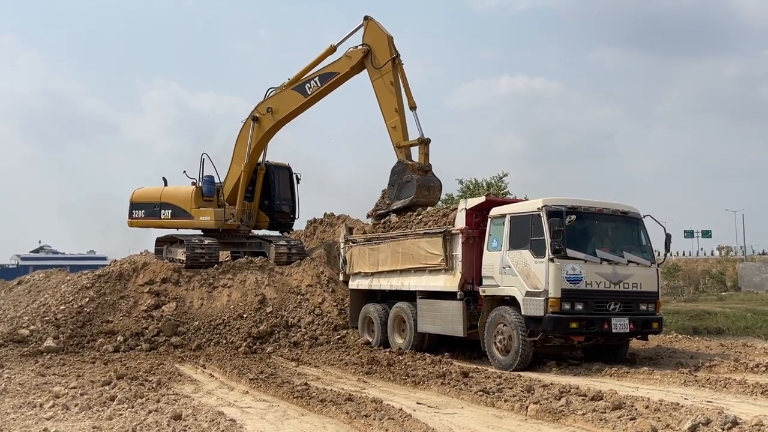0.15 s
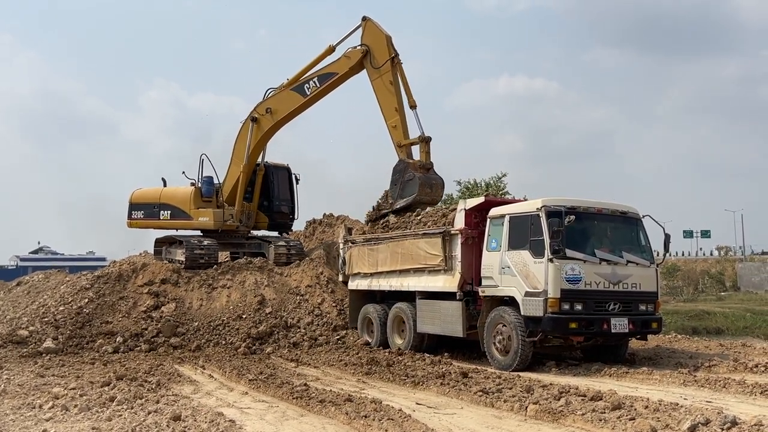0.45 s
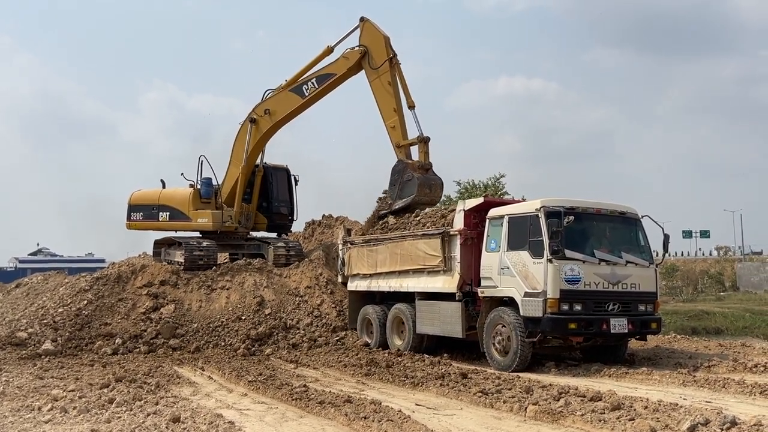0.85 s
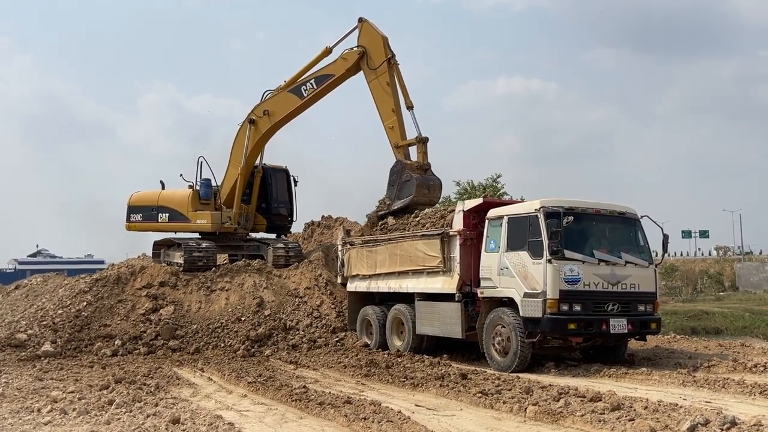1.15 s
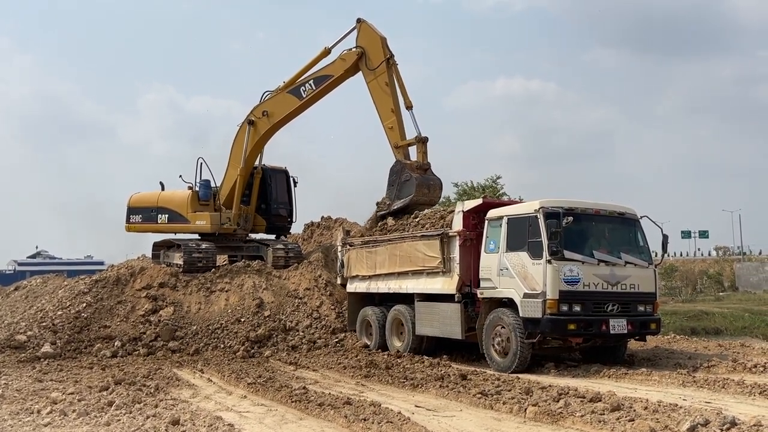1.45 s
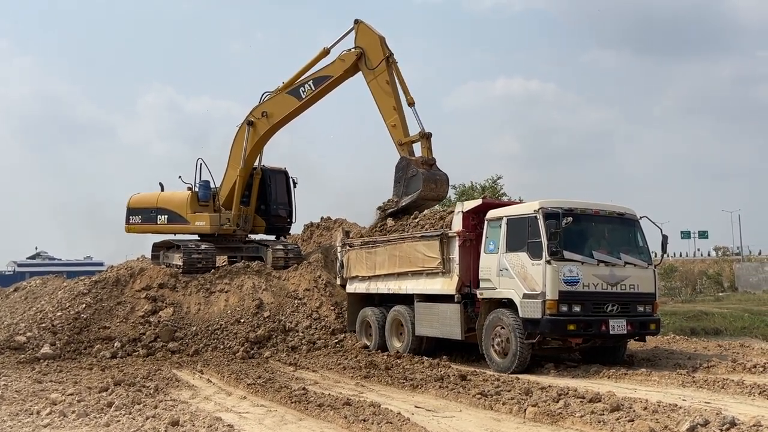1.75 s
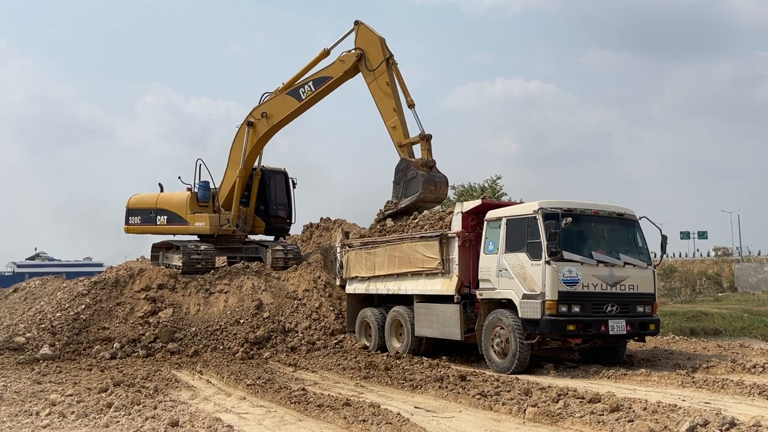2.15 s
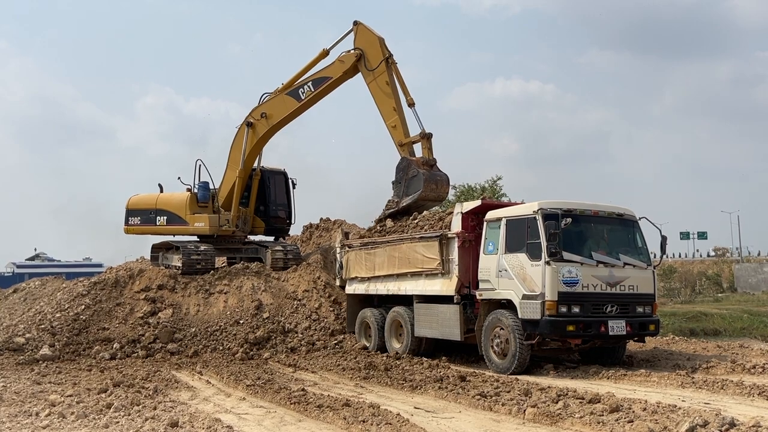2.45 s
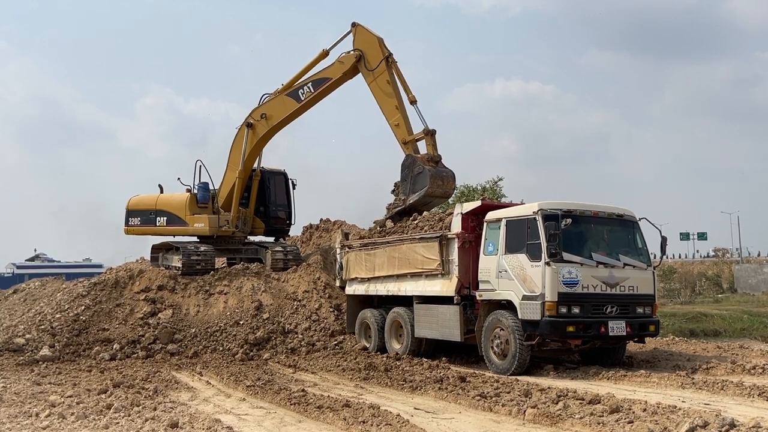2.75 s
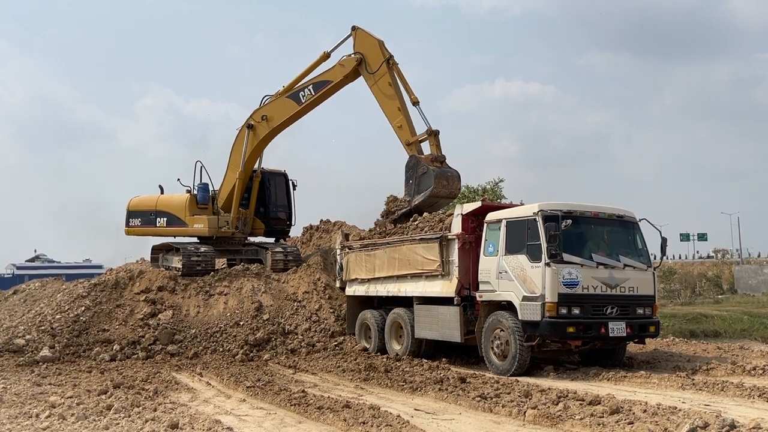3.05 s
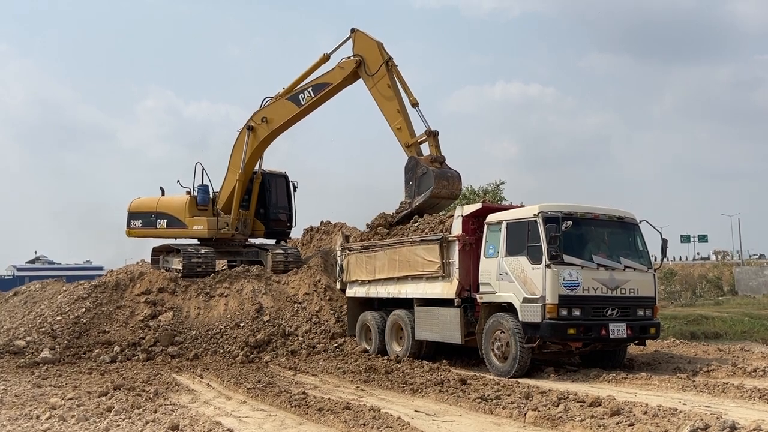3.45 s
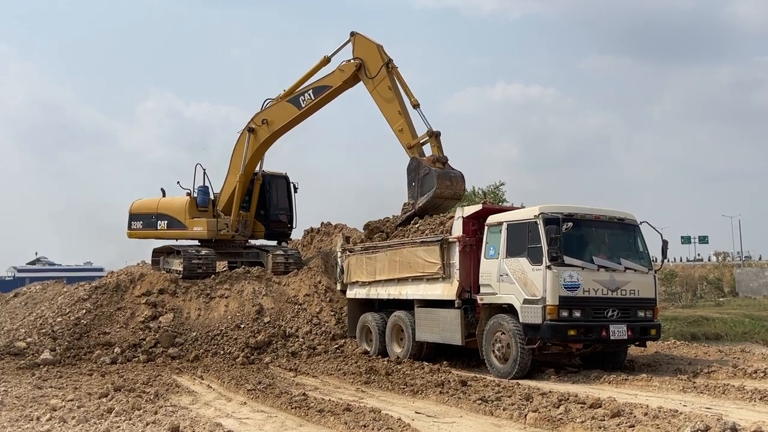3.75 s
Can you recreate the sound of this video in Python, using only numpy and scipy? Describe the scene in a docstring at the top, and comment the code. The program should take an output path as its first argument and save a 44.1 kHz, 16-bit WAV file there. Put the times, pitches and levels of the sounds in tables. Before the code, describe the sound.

An excavator's steel bucket clanks in quick clusters, after clods thud heavily into a truck bed. Its diesel drones and sags, hydraulics hiss, and a truck throbs low; open outdoor site, stereo microphone, no echo.

```python
"""A steel excavator bucket works in the load of an idling dump truck, on an open earthwork site.
Its loose joints clank in quick clusters: bursts of noise and sine modes. Its shell rings on as decaying sines.
Clods thud into the truck bed as short pushes with dull noise, and loose earth tumbles between them.
Behind, the excavator's diesel sags under load (sines locked to the firing rate) while its hydraulics hiss.
The truck throbs low; both machines stand ahead of a two-port microphone, with no echo."""
import sys
import numpy as np
from scipy import signal
from scipy.fft import rfft, irfft
from scipy.io import wavfile
from scipy.ndimage import uniform_filter1d

SR = 44100
rng = np.random.default_rng(int(sys.argv[2]) if len(sys.argv) > 2 else 0)


def store_pcm(level_fs):
    """Save levels as 16-bit WAV."""
    pcm = np.round(np.clip(level_fs, -1, 1) * 32767).astype(np.int16)
    wavfile.write(sys.argv[1], SR, np.atleast_2d(pcm).T)


N = 171990  # length in samples


def amp(db):
    """Decibels to gain."""
    return 10 ** (np.asarray(db) / 20)


def unit(x):
    """Scale to rms 1."""
    return x / np.sqrt(np.mean(x ** 2))


def curve(table, axis):
    """One column of a table, joined by straight lines over time."""
    rows = np.array(table)
    return np.interp(np.arange(N) / SR, rows[:, 0], rows[:, axis])


def noise(points, tilt_db=0, size=N):
    """Random-phase noise of a given spectrum, tilted in dB per octave, at rms 1."""
    hz, db = np.array(points).T
    octave = np.log2(np.maximum(np.fft.rfftfreq(size, 1 / SR), 10))
    spectrum_db = np.interp(octave, np.log2(hz), db)
    spectrum_db = spectrum_db + tilt_db * np.minimum(octave, np.log2(hz[-1]))
    phase = 2 * np.pi * rng.random(len(spectrum_db))
    return unit(irfft(amp(spectrum_db) * np.exp(1j * phase), size))


def wide(points, width_db, tilt_db=0, size=N):
    """Stereo noise: a common middle and a weaker side, opposite in the two channels."""
    middle = noise(points, tilt_db, size)
    side = amp(width_db) * noise(points, tilt_db, size)
    return middle + np.array([[1], [-1]]) * side


def walk(rate):
    """Smoothed random drift with a spread of 1, drawn anew at a rate in Hz."""
    k = int(SR / rate)
    steps = np.repeat(rng.standard_normal(N // k + 1), k)
    smooth = uniform_filter1d(uniform_filter1d(steps, k), k)
    return unit(smooth[:N])


def turns(hz):
    """Cycles run through at a moving rate, from a random start."""
    return np.cumsum(hz) / SR + rng.random()


def tone(cycles):
    """A sine of rms 1."""
    return np.sqrt(2) * np.sin(2 * np.pi * cycles)


def fade(t, attack_s, t60):
    """A quick linear rise, then an exponential decay by 60 dB in t60 seconds."""
    return np.minimum(t / attack_s, 1) * np.exp(-np.log(1000) * np.maximum(t - attack_s, 0) / t60)


def burst(envelope, sound):
    """Sound under an envelope, scaled so that its energy is the envelope's own."""
    shaped = envelope * sound
    return unit(shaped) * np.sqrt(np.mean(envelope ** 2))


def add(out, start, sound):
    """Mix a sound in at a time in seconds."""
    i = int(start * SR)
    out[:, i:i + sound.shape[-1]] += sound[..., :N - i]


FLUTTER_DB = 1.5  # spread of the level flutter of each engine line
WIDTH_DB = -10.5  # side against middle, for engine noise and rattle

# The truck's low exhaust throb. Each row: time in seconds, pitch in Hz, level in dB before the lope.
TRUCK_THROB = [(0, 53.3, -17), (.7, 57.3, -55), (1.38, 58.29, -42.5), (1.7, 57.93, -29),
               (2.15, 56.9, -26.5), (2.4, 57, -39), (2.85, 55.8, -25.5), (3.35, 56, -25.5),
               (3.9, 55.4, -26)]
# Drone lines of the idling truck. Each row: pitch in Hz, level in dB before the swell, relative waver.
TRUCK_DRONE = [(206.3, -37.5, 0.003), (283, -47.5, 0.0043), (487.4, -42.5, 0.0079)]
THROB_FLUTTER_DB, LOPE_DEPTH, LOPE_FIRINGS = 2, .45, 4
DRONE_FOLLOWS = 0.24  # dB of drone swell per dB of throb swell


def truck():
    """A low exhaust throb that lopes once an engine cycle, under a few lines that swell with it."""
    throb_db = curve(TRUCK_THROB, axis=2)
    cycles = turns(curve(TRUCK_THROB, axis=1))
    lope = 1 + LOPE_DEPTH * np.sin(2 * np.pi * cycles / LOPE_FIRINGS)
    throb = amp(throb_db + THROB_FLUTTER_DB * walk(20)) * lope * tone(cycles)
    drone = 0
    for hz, db, waver in TRUCK_DRONE:
        line = tone(turns(hz * (1 + waver * walk(20))))
        drone = drone + amp(db + FLUTTER_DB * walk(10)) * line
    swell_db = DRONE_FOLLOWS * (throb_db - throb_db.mean())
    return throb + amp(swell_db) * drone


# Excavator speed. Each row: time in seconds, firing rate in Hz before the wobble.
FIRING_RATE = [(0, 134.1), (.3, 129.2), (.6, 129.8), (.85, 136), (1.4, 134.6), (1.6, 129.5), (1.78, 127.6),
               (1.95, 134.1), (2.42, 134.8), (2.62, 127.5), (3.25, 124.6), (3.4, 132.9), (3.56, 125.5),
               (3.9, 128)]
# Engine effort. Each row: time in seconds, then changes in dB of firing note, rumble with clatter, and hiss.
ENGINE_EFFORT = [(0, -2, 0, 0), (.5, 5, -1.5, -1.5), (.75, -13, 1, -3), (1.1, -5.5, -2.5, -1.5),
                 (1.38, -2.5, -2, -3), (1.6, 2, -2, -0.5), (2.15, 0, 2, -0.5), (2.42, 2, -1.5, -1),
                 (2.8, 0, -2, 4), (3.3, 0, 0, 3.5), (3.65, 2.5, -1, 5), (3.9, -3.5, -3.5, 7)]
# Exhaust orders. Each row: multiple of the firing rate, level in dB at the free firing rate before effort,
# dB gained per Hz of sag under load.
EXHAUST_ORDERS = [(2 / 3, -37, 0.26), (1, -29.5, -0.14), (4 / 3, -44, 0.62), (3 / 2, -48, 0.89),
                  (8 / 3, -50.5, 0.21)]
# Spectrum of the engine's rumble. Each row: frequency in Hz, relative level in dB per Hz.
RUMBLE_SPECTRUM = [(20, -5), (45, -3), (85, 3), (140, -0.5), (215, -0.5), (255, -8.5), (400, -8.5),
                   (490, -6.5), (570, -12), (900, -20.5), (1500, -25.5), (3000, -38.5), (8000, -66)]
# Spectrum of the hydraulic hiss. Each row: frequency in Hz, relative level in dB per Hz.
HISS_SPECTRUM = [(500, 12), (1500, -3), (3000, -4), (5500, -5), (7200, -7.5), (9000, -3.5), (10300, -10),
                 (11200, -8.5), (12500, -54)]
# Thin sizzle, probably of a hydraulic valve. Each row: frequency in Hz, relative level in dB per Hz.
SIZZLE_SPECTRUM = [(7500, -17), (9500, -1), (11800, -8), (13000, -25)]
FREE_FIRING_HZ, WOBBLE = 132.6, 0.005  # unloaded firing rate, relative wobble of the speed
RUMBLE_DB, CLATTER_DB, HISS_DB, SIZZLE_DB = -28, -46, -47, -72.5  # levels before effort
CLATTER_HZ, CLATTER_SHARE = 1080, 1  # band of the clatter, its decay in firing periods
SIZZLE_GROWTH = 4  # dB of sizzle per dB of hiss effort


def excavator():
    """Exhaust orders locked to the firing, clatter at each firing, rumble and hydraulic hiss."""
    firing_hz = curve(FIRING_RATE, axis=1)
    cycles = turns(firing_hz * (1 + WOBBLE * walk(25)))
    sag_hz = FREE_FIRING_HZ - firing_hz
    note = 0
    for multiple, db, load_db in EXHAUST_ORDERS:
        order_db = db + load_db * sag_hz + FLUTTER_DB * walk(14)
        note = note + amp(order_db) * tone(multiple * cycles + rng.random())

    band = [(CLATTER_HZ / 8, -25), (CLATTER_HZ / 2, -2), (CLATTER_HZ, -2),
            (CLATTER_HZ * 4, -17), (CLATTER_HZ * 12, -42)]
    knocks = unit(np.exp(-(cycles % 1) / CLATTER_SHARE) * amp(3.3 * walk(90)))
    clatter = knocks * wide(band, WIDTH_DB)
    body = amp(RUMBLE_DB) * wide(RUMBLE_SPECTRUM, WIDTH_DB) + amp(CLATTER_DB) * clatter

    hiss_effort_db = curve(ENGINE_EFFORT, axis=3)
    hiss = amp(HISS_DB + hiss_effort_db) * wide(HISS_SPECTRUM, WIDTH_DB)
    sizzle = amp(SIZZLE_DB + SIZZLE_GROWTH * hiss_effort_db) * noise(SIZZLE_SPECTRUM)
    engine = amp(curve(ENGINE_EFFORT, axis=1)) * note + amp(curve(ENGINE_EFFORT, axis=2)) * body
    return engine + hiss + sizzle


# Loose earth tumbling between the clods. Each row: time in seconds, level in dB.
TUMBLE_LEVEL = [(.1, -40.5), (.22, -22.5), (.43, -21.5), (.55, -29), (.63, -73)]
# Spectrum of the tumbling earth. Each row: frequency in Hz, relative level in dB per Hz.
TUMBLING_EARTH = [(40, -17), (85, 7), (220, 1.5), (330, -25.5), (520, -22), (1200, -61.5)]
# Clods landing in the bed. Each row: start in seconds, level in dB, tilt in dB per octave, t60 in seconds.
CLOD_THUDS = [(.14, -13, -4, .07), (.175, -8, -1.5, 0.053), (0.207, -11, 1.5, .07),
              (0.225, -8, -4.5, 0.095), (.256, -14, 3, 0.11), (.327, -9.5, -4.5, 0.084),
              (0.341, -15.5, 6.5, 0.028), (.388, -15.5, -2, 0.1), (0.462, -12, -2.5, 0.11),
              (.484, -10.5, -2, 0.15), (.509, -8.5, -2, 0.094), (.519, -11, 4.5, 0.068),
              (.526, -6, -0.5, 0.1), (.541, -6.5, 4, 0.082), (.567, -12.5, -7.5, 0.11),
              (.843, -17, 2.5, 0.061), (1.204, -18, -2.5, .096), (2.117, -14.5, -1.5, .08),
              (2.195, -13.5, -1, 0.042), (2.241, -10.5, -5, 0.067)]
# Spectrum of a clod's dull rumble before its tilt. Each row: frequency in Hz, relative level in dB per Hz.
CLOD_SPECTRUM = [(25, -23), (48, -1), (75, 6.5), (130, -12), (220, -9.5), (330, -10.5), (520, -23),
                 (900, -56), (3000, -77), (12000, -100)]
THUD_ATTACK_S, THUD_WIDTH_DB = 0.00293, -12.5
PUSH_S, PUSH_DB = 0.003, 1  # width of an untilted clod's push, its peak against the rumble's rms
PUSH_TILT_DB = 12.5  # a clod this much brighter per octave pushes half as long


def clods():
    """Loose earth tumbles; each clod gives the bed one push, shorter if it is bright, and a brief dull rumble."""
    out = amp(curve(TUMBLE_LEVEL, axis=1)) * wide(TUMBLING_EARTH, THUD_WIDTH_DB)
    t = np.arange(SR // 2) / SR
    for start, db, tilt_db, t60 in CLOD_THUDS:
        push_s = PUSH_S * 2 ** (-tilt_db / PUSH_TILT_DB)
        u = t / push_s - 2
        push = amp(PUSH_DB) * (1 - 2 * u ** 2) * np.exp(-u ** 2)
        rumble = wide(CLOD_SPECTRUM, THUD_WIDTH_DB, tilt_db, size=len(t))
        add(out, start, amp(db) * burst(fade(t, THUD_ATTACK_S, t60), push + rumble))
    return out


# Knocks on the bucket's shell. Each row: start in seconds, level in dB,
# ring length as a share of the free ring (earth damps it).
SHELL_KNOCKS = [(.592, -20.5, 0.69), (1.842, -23, 0.52), (2.011, -16.5, 0.21), (2.1, -23.5, 0.62)]
# Modes of the shell. Each row: pitch in Hz, relative level in dB, free t60 in seconds.
SHELL_RING_MODES = [(340.4, -1.5, 0.19), (381.2, 0, 0.24), (443.5, -5.5, 1.96), (494.8, 0, 0.19),
                    (586, -13.5, 0.63), (723, -14, 0.81)]
SHELL_WOBBLE, SHELL_FLUTTER_DB = 0.0071, 0.5  # relative spread of pitch, spread of level


def shell():
    """Hollow knocks on the bucket's shell: decaying modes that waver together, one low note lingering."""
    out, t = np.zeros((2, N)), np.arange(SR) / SR
    for start, db, freedom in SHELL_KNOCKS:
        wavering_t = np.cumsum(1 + SHELL_WOBBLE * walk(65.0))[:len(t)] / SR
        ring = 0
        for hz, mode_db, t60 in SHELL_RING_MODES:
            ring = ring + amp(mode_db) * fade(t, 0.0051, t60 * freedom) * tone(hz * wavering_t)
        add(out, start, amp(db + SHELL_FLUTTER_DB * walk(39.3)[:len(t)]) * ring)
    return out


RATTLE_DB, RATTLE_RATE = 2.5, 350  # spread of the chatter, its rate in Hz


def crunch(size):
    """The fast uneven chatter of steel grinding on grit."""
    return amp(RATTLE_DB * walk(RATTLE_RATE))[:size]


# Modes of the bucket linkage. Each row: pitch in Hz, relative level in dB, t60 in seconds.
LINKAGE_MODES = [(770, -1, .3), (1227, -1.5, 0.28), (1487, 1, 0.084), (1740, -16, 0.27), (1868, -1, 0.062),
                 (1967, -2.5, 0.075), (2465, -17.5, 0.42), (2743, -2, 0.11), (2840, 4.5, .11),
                 (3620, 1, 0.093), (3970, -10, 0.092), (4450, 0.5, 0.041), (5370, -3, 0.075),
                 (5740, 1.5, 0.034)]
RESONANCE_DB, RESONANCE_WIDTH_HZ = 6, 47  # gain at the top of a lone resonance before the trim, its width


def linkage(x):
    """Whatever shakes the bucket is coloured by resonances at the modes of its linkage."""
    hz = np.fft.rfftfreq(N, 1 / SR)
    peaks = sum(1 / (1 + 2j * (hz - mode_hz) / RESONANCE_WIDTH_HZ) for mode_hz, _, _ in LINKAGE_MODES)
    gain = 1 + (amp(RESONANCE_DB) - 1) * peaks
    return irfft(rfft(x) * gain, N) / amp(RESONANCE_DB) ** (1 / 3)  # trims the added level


# Bucket clanks. Each row: start in seconds, crash level in dB before the linkage, tilt in dB per octave,
# ring against crash in dB, frequency in Hz around which the modes ring most.
BUCKET_CLANKS = [(.123, -33, -1, -12, 2170), (.176, -33, -1, -2, 2720), (.194, -28.5, 0, -4, 1570),
                 (.566, -30, -3.5, -17, 1983), (0.579, -20.5, 1, -23, 2050), (.59, -20, 4.5, -12, 2100),
                 (.763, -35, 3, 5, 2900), (.808, -23.5, -0.5, -8.5, 3440), (.852, -28.5, -3.5, -11, 1390),
                 (1.831, -23, 1.5, -5, 1810), (1.841, -13.5, -2, -10.5, 4200), (1.853, -21, 1, -3, 1530),
                 (1.927, -25, -6, -13, 2317), (2.012, -28.5, -4, -13, 2000), (2.051, -26.5, 2.5, -8, 2500),
                 (2.058, -18.5, -1.5, -14, 2380), (2.076, -16, -0.5, -7, 1300),
                 (2.082, -22.5, 4.5, 3.5, 3300), (2.84, -28, -3.5, -8, 1490), (3.246, -41.5, -2, 8, 2040),
                 (3.373, -26.5, 3.5, 3.5, 2860), (3.383, -23, -9.5, -10, 1250),
                 (3.393, -18.5, -2.5, -2, 1690), (3.404, -20.5, -2, -4.5, 3900)]
# Spectrum of a steel crash before tilt and linkage. Each row: frequency in Hz, relative level in dB per Hz.
STEEL_SPECTRUM = [(100, -19), (280, -8), (400, 8), (750, 1.5), (930, 0), (1500, -1.5), (2050, 1),
                  (3200, -4), (4300, -9), (6200, -18), (9000, -24), (12000, -48.5)]
# Earth and steel rattling down after the big clanks. Each row: start in seconds, level in dB before the
# linkage, tilt in dB per octave, t60 in seconds.
RATTLE_FALLS = [(.595, -25.5, 5.5, 0.31), (1.85, -22, 1, 0.43), (2.075, -20, -2.5, 0.38),
                (3.4, -21.5, -4, 0.26)]
# Spectrum of that rattle before tilt and linkage. Each row: frequency in Hz, relative level in dB per Hz.
RATTLE_SPECTRUM = [(200, 6), (420, 11.5), (750, 12), (1000, 1), (2100, -1), (3000, -11), (4500, -18),
                   (12000, -60)]
CLANK_ATTACK_S, CLANK_T60_S, RATTLE_RISE_S = 0.0014, 0.12, 0.023
FOCUS_DB_PER_OCTAVE = 20  # loss of a mode away from the clank's favoured frequency


def bucket():
    """Steel on steel: dense resonant crashes, modes the contact favours, duller rattle after big blows."""
    crashes, rings, t = np.zeros((2, N)), np.zeros((2, N)), np.arange(SR) / SR
    hz, mode_db, t60 = np.array(LINKAGE_MODES).T[:, :, None]
    for start, db, tilt_db, ring_db, focus_hz in BUCKET_CLANKS:
        grinding = crunch(len(t)) * noise(STEEL_SPECTRUM, tilt_db, size=len(t))
        crash = burst(fade(t, CLANK_ATTACK_S, CLANK_T60_S), grinding)
        add(crashes, start, amp(db) * crash)

        # each blow strikes the modes a little differently
        focus_loss_db = FOCUS_DB_PER_OCTAVE * abs(np.log2(hz / focus_hz))
        gains = amp(mode_db - focus_loss_db + rng.standard_normal(hz.shape))
        pitch = hz * (1 + 0.002 * rng.standard_normal(hz.shape))
        modes = gains * fade(t, CLANK_ATTACK_S, t60) * tone(pitch * t + rng.random(hz.shape))
        ring = modes.sum(axis=0) / np.linalg.norm(gains)
        add(rings, start, amp(db + ring_db) * ring)
    for start, db, tilt_db, decay_s in RATTLE_FALLS:
        rattle = crunch(len(t)) * wide(RATTLE_SPECTRUM, WIDTH_DB, tilt_db, size=len(t))
        add(crashes, start, amp(db) * burst(fade(t, RATTLE_RISE_S, decay_s), rattle))
    return linkage(crashes) + rings


def scene():
    """Both machines stand ahead of the microphone in the open."""
    return truck() + excavator() + clods() + shell() + bucket()


# Phase between the two microphone ports. Each row: frequency in Hz, radians by which the left leads.
PORT_LEAD = [(0, 0), (1700, 0.22), (2700, 0.6), (4500, 0.74), (6400, 0), (8000, -0.5), (10100, -2.5),
             (11400, -5.5)]
# Level between the ports. Each row: frequency in Hz, left minus right in dB.
PORT_LEVEL = [(100, 0.33), (700, -0.52), (2200, 0.86)]
LOW_CUT_HZ, TOP_HZ = 42.6, 12600
CEILING = .86  # full-scale share that rounded peaks approach, before the top cut


def record(dry):
    """Two ports differ in phase and level; the recorder cuts deep bass, rounds high peaks and cuts the top."""
    hz = np.fft.rfftfreq(N, 1 / SR)
    phase = np.interp(hz, *np.array(PORT_LEAD).T)
    balance_db = np.interp(hz, *np.array(PORT_LEVEL).T)
    left = amp(balance_db / 2) * np.exp(1j * phase)
    right = amp(-balance_db / 2)
    ports = irfft(rfft(dry) * np.array([left, right]), N)
    ports = signal.sosfilt(signal.butter(2, LOW_CUT_HZ, "high", fs=SR, output="sos"), ports)
    ports = ports / (1 + (ports / CEILING) ** 6) ** (1 / 6)
    return signal.sosfilt(signal.ellip(8, .2, 70, TOP_HZ, fs=SR, output="sos"), ports)


dry = scene()
out = record(dry)
store_pcm(out)
```